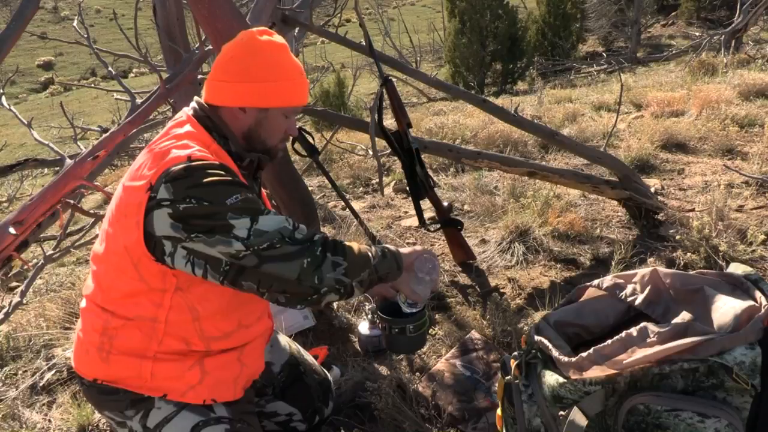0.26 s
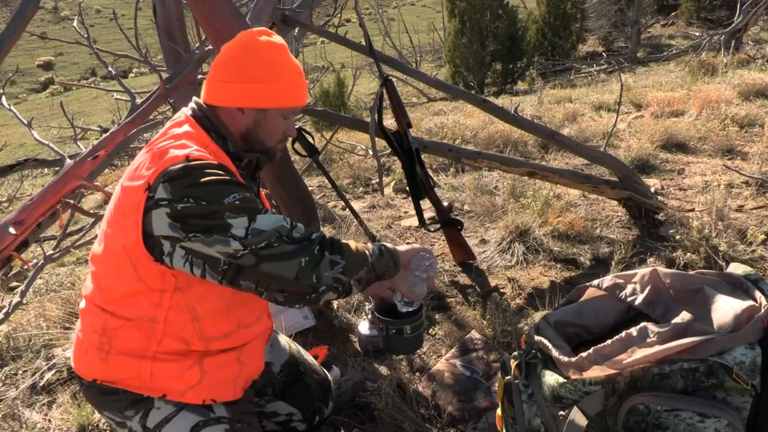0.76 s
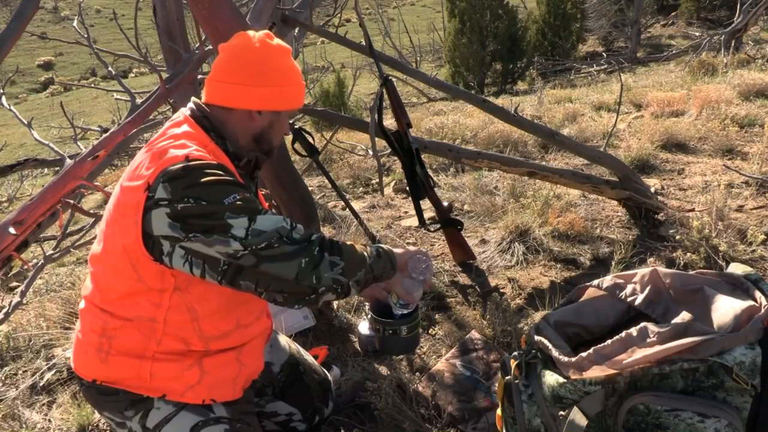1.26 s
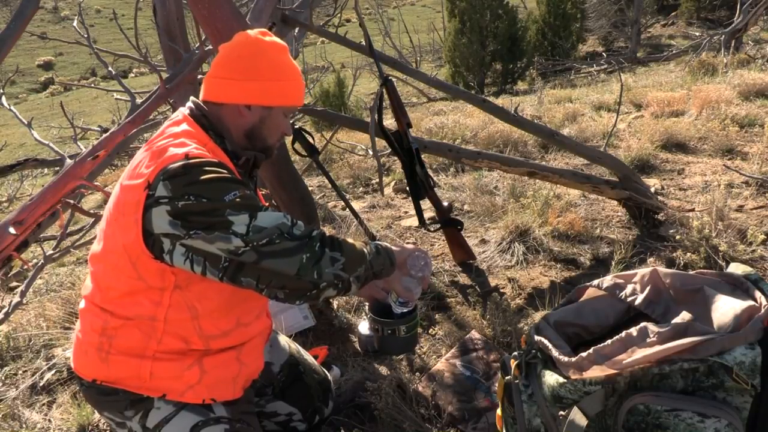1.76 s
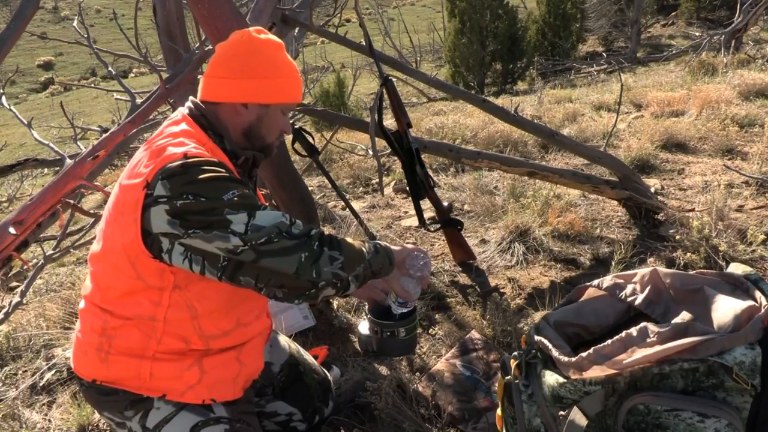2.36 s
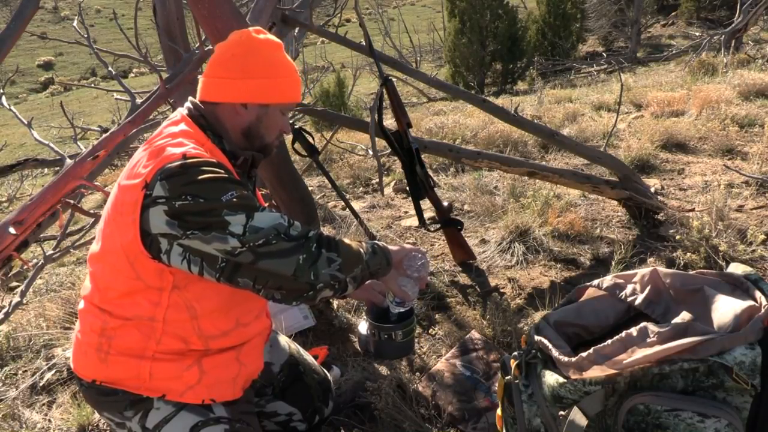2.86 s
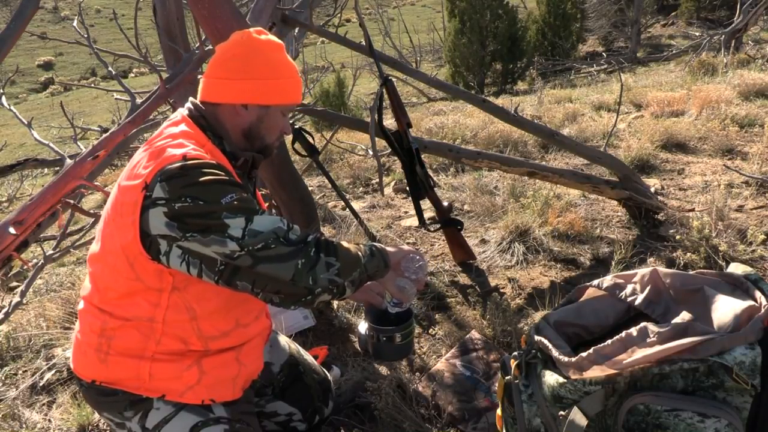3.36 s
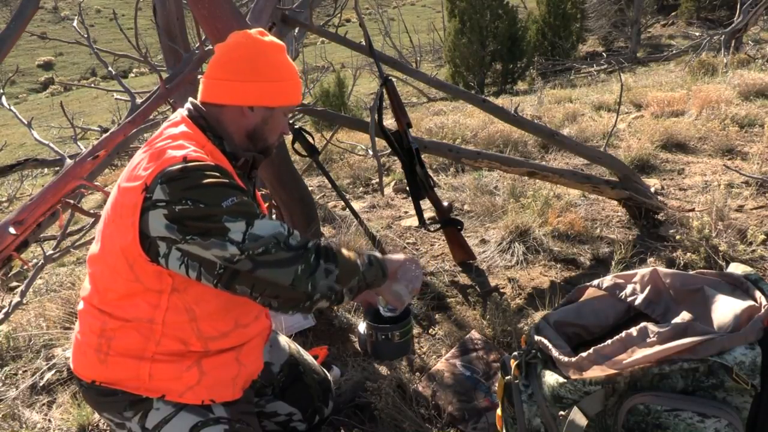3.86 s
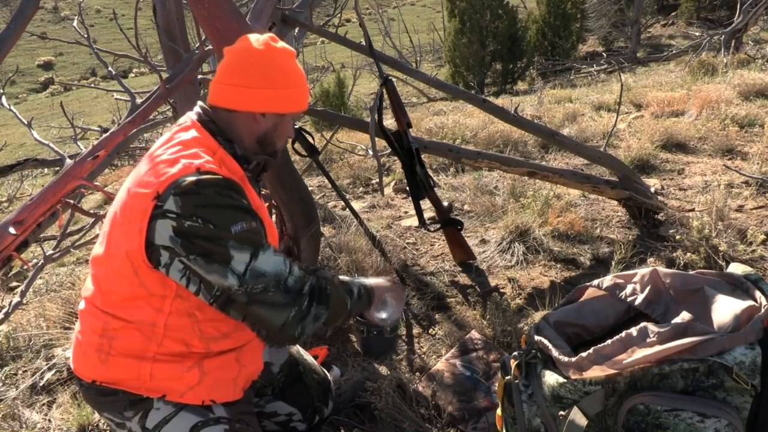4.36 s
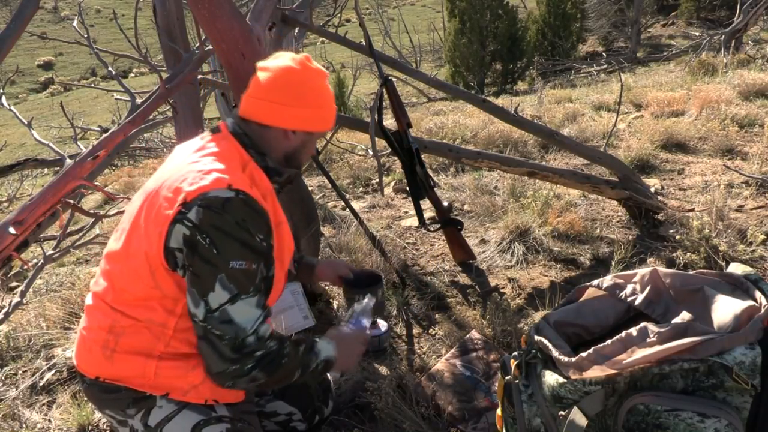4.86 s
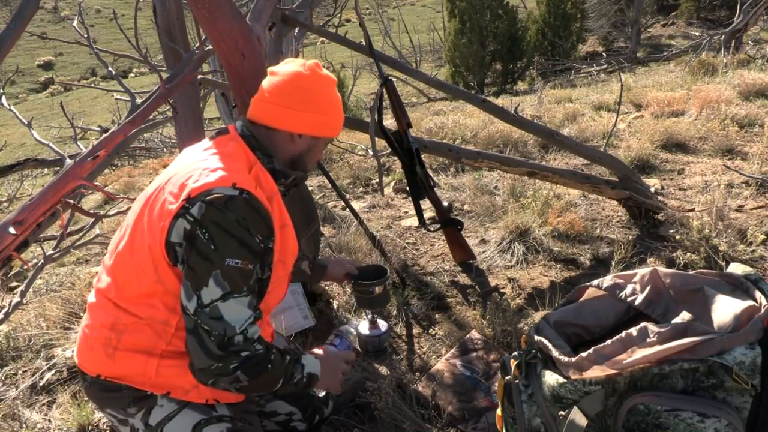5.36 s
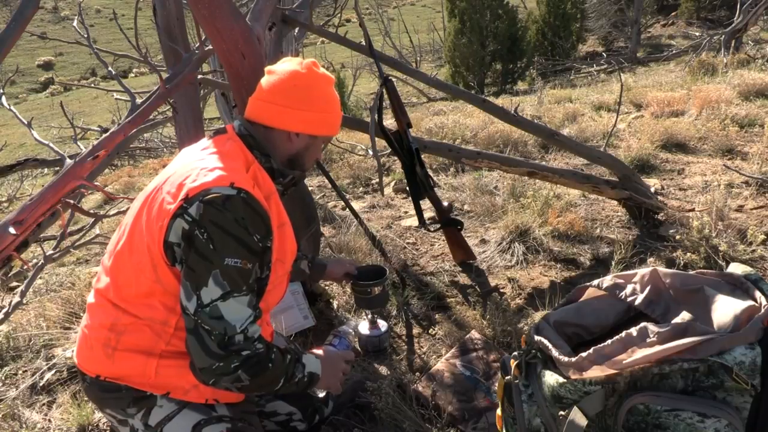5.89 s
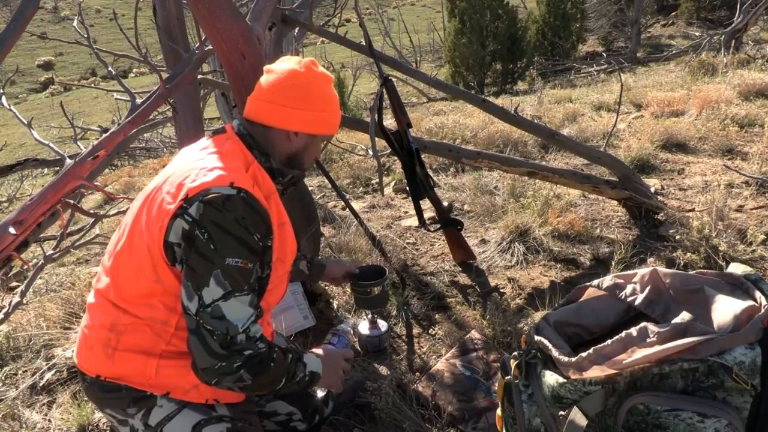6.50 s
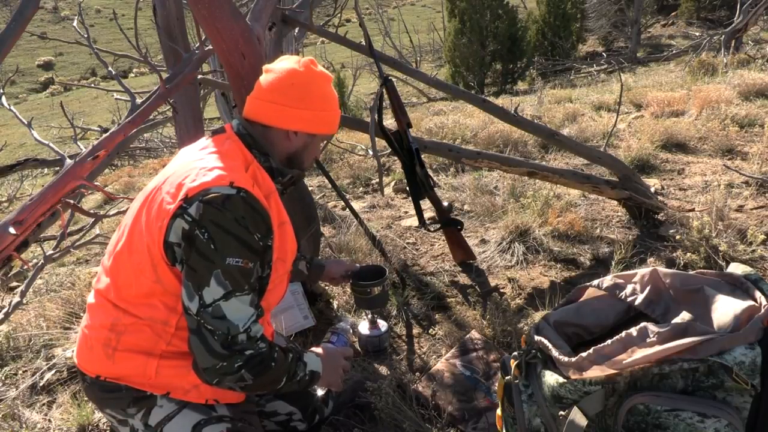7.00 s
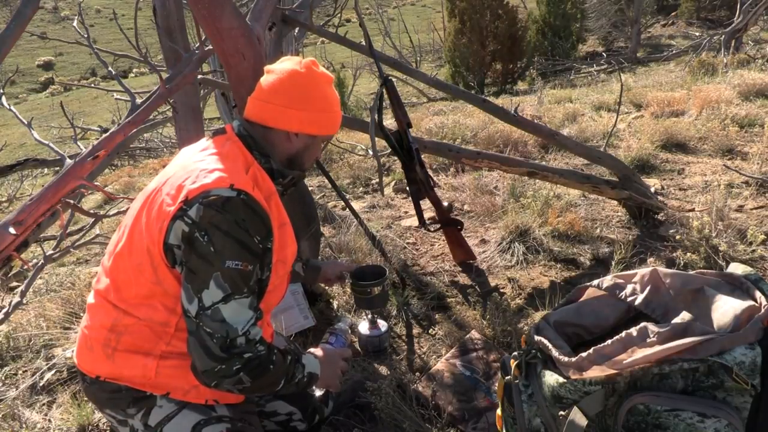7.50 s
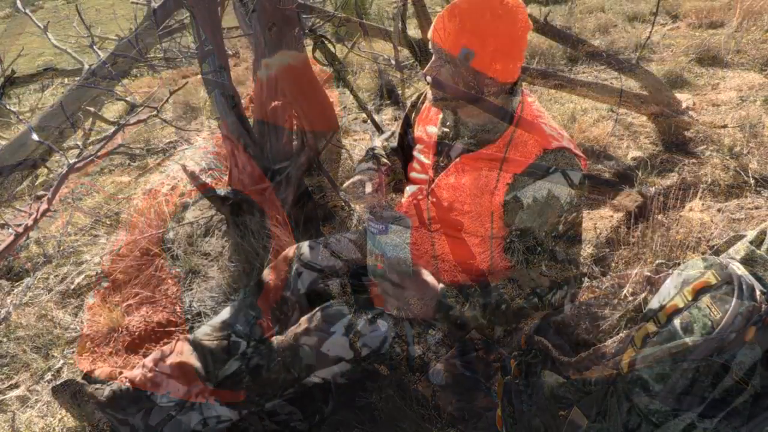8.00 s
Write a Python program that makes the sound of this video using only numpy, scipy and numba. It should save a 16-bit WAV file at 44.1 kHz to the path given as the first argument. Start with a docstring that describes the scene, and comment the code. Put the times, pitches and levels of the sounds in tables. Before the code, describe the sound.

A close outdoor microphone picks up lumpy pouring, chirping bubbles and droplets in a small metal pot, the tone rising slightly as it fills. After the stream ends, faint scuffs lead to one hard plastic snap, a cluster of tiny metallic clinks and light sliding. Wind rumble, slight hiss and a weak distant hum continue until final knocks and rustling.

```python
"""Water poured into a metal pot

Water glugs from a plastic bottle into a thin metal pot: bubbles chirp, drops ring, and the lower pot modes rise
as it fills. Then the bottle snaps back into shape (noise bursts through resonances), small metal parts clink
(noise bursts into modes) and cloth rustles (dense grains).
Outdoors, wind buffets the microphone (shaped noise) and a faint drone of two harmonics hums far away."""
import sys
import numpy as np
from scipy import signal
from scipy.fft import rfft, irfft
from scipy.io import wavfile
from numba import njit

SR = 44100
rng = np.random.default_rng(int(sys.argv[2]) if len(sys.argv) > 2 else 0)


def output_pcm(signal):
    """Save a mono or channel-first signal as 16-bit PCM at the path in sys.argv[1].

    Samples are clipped to [-1, 1] before scaling.
    """
    pcm = np.clip(np.atleast_2d(signal).T, -1, 1) * 32767
    wavfile.write(sys.argv[1], SR, np.round(pcm).astype(np.int16))


N = 363384

# the pouring stream: t/s, gurgle level/dB, spray level/dB
STREAM = [(0.0, -50.5, -61), (0.23, -52.5, -58.5), (0.45, -44, -57), (1.21, -45.5, -54), (1.47, -49, -56.5),
          (1.86, -44, -55.5), (1.99, -48.5, -53.5), (2.23, -49.5, -56.5), (2.66, -47.5, -57),
          (3.18, -39, -49.5), (3.65, -55, -62.5), (3.75, -63, -65)]
# spectral density of the spray: f/Hz, level/dB
SPRAY_SPECTRUM = [(1200, -32), (2000, -12.5), (3200, -4), (5000, 1), (6600, -5.5), (8000, 0), (10300, -10),
                  (13700, -1), (15700, -7), (16400, -40)]
# modes of the wall and the air above the water: f empty/Hz, f full/Hz, level/dB, t60/s
POT_MODES = [(715, 830, -7, 0.11), (1150, 1190, 8, 0.0081), (1864, 1950, -7, 0.07),
             (1983, 2030, -11, 0.035), (2510, 2540, -16, 0.039), (3100, 3060, -16.5, 0.032)]
FULL_AT_S = 3.1
DROP_T60_S = 0.014   # a drop ringing on the water


def amp(db):
    """Logarithmic level: decibels to an amplitude factor."""
    return 10 ** (np.asarray(db) / 20)


def unit(x):
    """Normalisation by signal power: scale to rms 1."""
    return x / np.sqrt(np.mean(x ** 2) + 1e-20)


def in_time(rows, outside_db=None):
    """Linear interpolation: each column of a curve at every sample."""
    s, *columns = np.transpose(rows)
    t = np.arange(N) / SR
    return np.array([np.interp(t, s, column, outside_db, outside_db) for column in columns])


def coloured(x, spectrum):
    """Spectral shaping: weight each frequency by a dB curve over log frequency; rms 1."""
    hz = np.maximum(np.fft.rfftfreq(len(x), 1 / SR), 1)
    f, db = np.transpose(spectrum)
    gain = amp(np.interp(np.log(hz), np.log(f), db))
    return unit(irfft(rfft(x) * gain, len(x)))


def band(x, lo_hz, hi_hz):
    """Causal Butterworth band-pass."""
    edges = [lo_hz, min(hi_hz, .45 * SR)]
    return signal.sosfilt(signal.butter(2, edges, "band", fs=SR, output="sos"), x)


def drift(rate_hz):
    """Low-passed noise: white noise through a double real pole, a slow random sway of rms 1."""
    r = np.exp(-2 * np.pi * rate_hz / SR)
    noise = rng.standard_normal(N + SR)
    return unit(signal.lfilter([1], [1, -2 * r, r * r], noise)[SR:])   # drop the filter's first second


def add(out, s, sound):
    """Superposition: mix a short sound in at a time."""
    i = int(s * SR)
    out[i:i + len(sound)] += sound[:max(N - i, 0)]


def grains(per_s, spread_db):
    """Shot noise: clicks at random times, of uneven size and random sign."""
    sizes = amp(spread_db * np.minimum(rng.exponential(1, N), 5)) * rng.choice([-1, 1], N)
    return sizes * (rng.random(N) < per_s / SR) + 1e-18


def ring(x, hz, t60):
    """Damped oscillator as a two-pole filter; a unit click rings at height about 1."""
    r, w = amp(-60 / (t60 * SR)), 2 * np.pi * hz / SR
    return signal.lfilter([0, np.sin(w)], [1, -2 * r * np.cos(w), r * r], x)


@njit
def glide(x, hz, t60, sr):
    """Damped oscillator of moving frequency; a unit click rings at height about 1."""
    y = np.zeros(len(x))
    r = 10 ** (-3 / (t60 * sr))
    for i in range(2, len(x)):
        w = 2 * np.pi * hz[i] / sr
        y[i] = np.sin(w) * x[i - 1] + 2 * r * np.cos(w) * y[i - 1] - r * r * y[i - 2]
    return y


def bubble(hz, t60, rise, swell_s, scoop=0):
    """Bubble resonance: a sine that swells, dies and by its rise climbs towards the surface; peak 1."""
    scoop_s = 0.0006   # time constant of the climb from below at birth
    t = np.arange(int((t60 + 3 * swell_s) * SR)) / SR
    climb = rise * t * t / t60   # the pitch is up by a share 2 * rise after one t60
    birth = np.clip(scoop, -.5, .6) * scoop_s * np.exp(-t / scoop_s)
    cycles = hz * (t + climb + birth)
    envelope = amp(-60 * t / t60) * (1 - np.exp(-t / swell_s)) ** 2
    tone = np.sin(2 * np.pi * (cycles - cycles[0])) * envelope
    return tone / np.abs(tone).max()


def pot(blows):
    """Modal resonance: modes shift as the level climbs, the lower ones upward, and waver as it sloshes."""
    fill = np.clip(np.arange(N) / SR / FULL_AT_S, 0, 1)
    modes = []
    for empty_hz, full_hz, db, t60 in POT_MODES:
        hz = (empty_hz + (full_hz - empty_hz) * fill) * (1 + 0.025 * drift(10.4))
        modes.append(amp(db) * glide(blows, hz, t60, SR))
    return modes


def droplets(per_s, cycles):
    """Independent resonators: tiny drops ring at one of 36 pitches with equal t60 in cycles; rms 1."""
    hits, dealt = grains(per_s, 4.3), rng.integers(0, 36, N)
    total = np.zeros(N)
    for k, hz in enumerate(np.geomspace(2200, 15000, 36)):
        total += ring(hits * (dealt == k) + 1e-18, hz, cycles / hz) * np.sqrt(hz)
    return coloured(total, SPRAY_SPECTRUM)


def breaks_db():
    """Interrupted flow: level dips where the stream breaks off while air enters the bottle."""
    # breaks in the flow: middle t/s, length/s
    breaks = [(0.383, 0.074), (0.814, 0.051), (1.01, 0.012), (1.244, 0.031), (1.408, 0.056), (1.542, 0.027),
              (1.625, 0.048), (1.876, 0.06), (2.096, 0.056), (2.407, 0.046), (2.56, 0.062), (2.868, 0.078),
              (3.054, 0.11), (3.192, 0.068), (3.417, 0.036)]
    out = np.zeros(N)
    for s, length in breaks:
        add(out, s - length / 2, -9.5 * np.hanning(int(length * SR)) ** .5)   # dB
    return out


def lesser(count):
    """Random events: rows (s, dB about a median less any dip, three chances 0-1) as the stream runs."""
    when, size, *chances = rng.random((count, 5)).T
    s = when * STREAM[-2][0]
    db = 14 * (size - .5) + 2 * breaks_db()[(s * SR).astype(int)]
    return np.transpose([s, db, *chances])


def stream():
    """Random excitation of resonators: small bubbles and spray, lumpy as the flow breaks up."""
    gurgle_db, spray_db = in_time(STREAM, outside_db=-120) + breaks_db()
    lumps = amp(5.8 * np.minimum(drift(21.8), 1.8))
    small_bubbles = np.zeros(N)
    for s, pitch, size, rise in rng.random((1000, 4)):
        hz = 560 * 2.5 ** pitch
        chirp = bubble(hz, 25 / hz, 0.34 * rise - .05, 0.0021)
        add(small_bubbles, s * 3.75, amp(20 * size) * chirp)
    pot_ring = unit(sum(pot(grains(790, 3.6) * lumps)))
    churn = unit(band(grains(3000, 3.0), 550, 1750)) * lumps ** 0.4   # churning froth
    gurgle = pot_ring + amp(-7.0) * unit(small_bubbles) + amp(-9.5) * churn
    drops = droplets(3000, cycles=56.0) * lumps ** 0.6
    froth = unit(band(grains(6000, 3.7), 1200, 4600)) * lumps ** 0.52
    spray = drops + amp(-10.5) * froth
    return amp(gurgle_db - 6.0) * gurgle + amp(spray_db - 3.0) * spray


def plops():
    """Bubble resonance: each large bubble chirps, born in a short dull slap; lesser ones come at random."""
    # large bubbles: t/s, level/dB, f/Hz, t60/s, relative slap level/dB, swell/ms
    large = [(.064,-33.5,680,0.031,-39.5,.4), (.113,-41,700,0.049,-48,2), (.156,-37.5,1150,0.057,-48,.5),
             (.157,-43,700,.04,-58,1), (.175,-43,690,0.12,-44,0.88), (.234,-35.5,733,0.049,-47,1.5),
             (.261,-22.5,707,0.035,-33.5,0.46), (.275,-34.5,760,0.096,-34.5,5.1),
             (.305,-42,730,0.059,-52,3.6), (.397,-35,720,0.045,-38,2.2), (.407,-21,754,0.05,-27.5,1.7),
             (.455,-35,686,0.032,-40,0.89), (.479,-27,684,0.03,-42,0.54), (.508,-32.5,784,0.043,-34.5,0.88),
             (.539,-37,760,0.046,-36,.6), (.551,-35,690,0.077,-52,4), (.589,-36,720,0.037,-42,0.68),
             (.607,-47,1200,.03,-44,1), (.62,-42,1240,.03,-55,1), (.65,-39,1250,.035,-51,1),
             (.676,-38,780,.035,-52,1.3), (.708,-38,720,0.022,-42,.8), (.735,-32.5,680,0.024,-55,.7),
             (.776,-48,730,0.037,-59,1), (.793,-40,725,0.044,-56,1), (.833,-42.5,1340,0.042,-60,1.1),
             (.852,-56,700,.04,-62,1), (.871,-48,750,.05,-38,.7), (.901,-38,740,0.069,-52,3.8),
             (.936,-37.5,740,0.074,-31.5,.7), (1.03,-44,710,0.067,-53,2), (1.059,-37,748,0.1,-57,2.3),
             (1.084,-41,1060,.035,-54,1), (1.112,-42.5,786,0.056,-53,2), (1.156,-35,754,0.038,-49,.7),
             (1.191,-37,1290,0.054,-50,.6), (1.2,-37,752,0.096,-58,3.3), (1.275,-38,778,0.16,-37.5,.7),
             (1.317,-25.5,770,0.047,-41,0.59), (1.347,-39.5,767,0.09,-43,2.2), (1.266,-47,735,.04,-42,1.5),
             (1.44,-35.5,1130,0.052,-42,.7), (1.492,-38,720,.03,-53,1), (1.549,-37,730,0.044,-36,.5),
             (1.617,-41,1270,.03,-51,.8), (1.654,-28.5,770,0.029,-38,0.38), (1.703,-33,757,0.066,-50,2),
             (1.723,-21.5,750,0.025,-43,1), (1.736,-22,780,0.027,-52,1), (1.772,-33,774,0.028,-50,1),
             (1.785,-31,747,0.085,-41,0.9), (1.937,-35,1065,.025,-46,0.36), (1.954,-36,790,0.054,-54,3),
             (2.014,-18.5,678,0.026,-47,1.8), (2.033,-35.5,768,0.066,-50,1.5), (2.034,-36,1350,0.037,-55,1),
             (2.064,-40.5,742,.09,-56,1.5), (2.151,-32.5,790,.065,-38.5,0.76), (2.178,-36,750,.03,-44,.7),
             (2.203,-44,1260,0.033,-57,1.5), (2.216,-51,810,.04,-50,2), (2.281,-41,805,0.046,-39,.7),
             (2.302,-40,774,0.047,-52,1.5), (2.328,-31.5,1270,0.022,-42,0.55), (2.391,-40,770,.04,-52,1.8),
             (2.427,-42,764,.045,-48,1.1), (2.455,-35.5,860,0.037,-46,.8), (2.5,-35,724,0.026,-55,0.63),
             (2.527,-34.5,825,0.04,-52,0.89), (2.605,-21.5,802,0.028,-34.5,1), (2.636,-40,1080,.04,-46,1),
             (2.67,-41,700,.05,-49,2), (2.738,-34.5,724,0.029,-54,1), (2.758,-32.5,1260,0.037,-41,.6),
             (2.772,-26.5,775,0.024,-44,0.77), (2.914,-19,789,0.037,-28.5,0.63),
             (2.947,-34,712,.06,-41,1.5), (2.96,-26,655,0.063,-39,1.7), (2.985,-39,790,0.056,-38,1),
             (3.082,-26,779,0.089,-29.5,0.81), (3.125,-24,1400,0.027,-38,0.45), (3.169,-39,856,0.07,-54,1),
             (3.222,-42,796,.03,-51,1.5), (3.223,-41,1300,.04,-55,1.5), (3.237,-25,770,0.022,-32,0.38),
             (3.249,-38,787,0.12,-54,1.8), (3.289,-39.5,704,0.053,-50,1.5), (3.324,-39,766,0.064,-53,1),
             (3.348,-36,890,0.034,-44,0.71), (3.408,-51,1440,0.044,-53,2), (3.457,-35,1090,0.057,-44,.6),
             (3.482,-44,1050,0.039,-53,.6), (3.551,-35,1230,.04,-52,0.66), (3.59,-40,1400,.03,-50,1)]
    median_db = -56   # of the lesser bubbles
    out, t = np.zeros(N), np.arange(SR // 20) / SR
    small = []
    for s, db, a, b, c in lesser(count=16):
        mode_hz = np.interp(s, [0, FULL_AT_S], POT_MODES[int(a > .8)][:2])   # pitched near a pot mode
        level_db = median_db + db
        small.append((s, level_db, mode_hz * (1.0 + 0.066 * b), .05, level_db - 12 * c, 1 + 2 * b))
    rows = list(large) + small
    for (s, db, hz, t60, slap_db, swell_ms), noise in zip(rows, rng.standard_normal((len(rows), len(t)))):
        chirp = bubble(hz, max(t60, .01), 0.033, max(swell_ms, .1) / 1000, scoop=0.2)   # starts 20 % low
        add(out, s, amp(db) * chirp)
        add(out, s, amp(slap_db + 14.5) * band(noise * amp(-60 * t / 0.054), 286, 1230))
    return out


def glugs():
    """Cavity resonance: the pitch glides, mostly up, ever faster as the pocket shrinks until it bursts."""
    # air pockets: start t/s, length/s, first f/Hz, last f/Hz, level/dB before the wobble
    pockets = [(0.64, 0.037, 634, 810, -40), (0.979, 0.023, 590, 810, -43), (1.438, 0.035, 634, 856, -39.5),
               (1.547, 0.015, 1105, 845, -28), (1.553, 0.041, 518, 920, -26),
               (1.729, 0.016, 1220, 1255, -27.5), (1.819, .022, 607, 870, -38),
               (2.06, 0.012, 1280, 1530, -34), (2.33, 0.049, 488, 900, -39.5),
               (2.37, 0.017, 1040, 1610, -31.5), (2.665, 0.017, 967, 1350, -38),
               (2.685, 0.022, 1060, 1420, -39), (2.778, 0.038, 593, 877, -38),
               (2.806, 0.022, 843, 1356, -43), (2.935, 0.022, 1330, 1540, -39),
               (3.005, 0.025, 1350, 1200, -39.5), (3.118, 0.033, 598, 880, -36),
               (3.233, 0.026, 383, 500, -32.5), (3.337, 0.036, 813, 1300, -43),
               (3.424, 0.025, 1150, 1500, -50), (3.463, 0.013, 1020, 1440, -38.5),
               (3.598, 0.018, 700, 1370, -34.5)]
    out = np.zeros(N)
    for s, length, first_hz, last_hz, db in pockets:
        u = np.linspace(0, 1, int(length * SR))
        hz = first_hz * (last_hz / first_hz) ** (u ** 1.46)
        phase = 2 * np.pi * np.cumsum(hz) / SR
        add(out, s, amp(db) * np.sin(np.pi * u ** 2.1) * np.sin(phase))   # late swell, quick stop
    return out * amp(2.5 * drift(77.0))   # a pocket wobbles as it shrinks


def splashes():
    """Impact spatter: each slug throws dying drops, with one distinct plink; lesser slugs come at random."""
    # slugs of water: t/s, relative level/dB, t60/s, relative brightness/dB, plink f/Hz
    slugs = [(0.071, -36, 0.03, -14, 3000), (0.1017, -39, 0.037, -12, 3700),
             (0.154, -34.5, 0.023, -7, 8300), (0.2438, -33.5, 0.068, -21, 4940),
             (0.2593, -34.5, 0.23, -14.5, 3070), (0.397, -32, .06, -10, 2400),
             (0.407, -17, 0.037, -22, 2510), (0.416, -16, 0.041, -11, 7260),
             (0.4823, -36, 0.052, -14, 2570), (0.5092, -34, 0.095, -15, 2600),
             (0.5404, -30, 0.086, -13, 2510), (0.5906, -40, 0.04, -9, 4730), (0.634, -41, 0.04, -7, 2450),
             (0.651, -45, 0.045, -8, 2510), (0.6784, -46, 0.05, -4.5, 2400), (0.7364, -35, 0.11, -19, 2850),
             (0.8682, -25, 0.034, -11.5, 4800), (0.9378, -44, 0.065, -4.5, 2270),
             (1.0287, -35, 0.033, -10, 4330), (1.038, -33, 0.05, -17, 7200), (1.058, -33, 0.017, -17, 2350),
             (1.0979, -34, 0.056, -13, 4430), (1.1373, -32.5, 0.031, -3.5, 3760),
             (1.1564, -23, 0.013, -6, 7570), (1.1897, -38, 0.031, -9, 4200),
             (1.2727, -26.5, 0.056, -12.5, 7700), (1.3146, -26, 0.032, -14, 2510),
             (1.3425, -34.5, 0.08, -13, 3190), (1.4396, -33.5, 0.065, -10, 4960),
             (1.481, -44, 0.028, -13, 4930), (1.4945, -33.5, 0.042, -9.5, 5130),
             (1.5504, -44, 0.04, -9, 2700), (1.578, -37, 0.044, -12, 4330), (1.5898, -45, 0.032, 6, 2700),
             (1.6545, -26, 0.063, -15.5, 4920), (1.723, -40, 0.048, -6, 5260),
             (1.7434, -38.5, 0.045, -13, 4500), (1.7794, -33, 0.045, -24, 3500),
             (1.8352, -31, 0.021, -28, 2900), (1.9155, -39, 0.064, -7, 3000),
             (1.95, -28.5, 0.017, -18, 2320), (1.9766, -40, 0.035, -14, 2370),
             (2.0136, -21, 0.027, -31, 4880), (2.0662, -20, 0.033, -23, 8070),
             (2.1512, -23.5, 0.052, -15, 4940), (2.1724, -38, 0.064, 1.5, 2400),
             (2.2811, -17, 0.03, -16.5, 4550), (2.3264, -35, 0.04, -24, 2580),
             (2.352, -25.5, 0.029, -24, 4800), (2.3762, -24.5, 0.011, -28, 3940),
             (2.4334, -34.5, 0.13, -10, 4690), (2.502, -37, 0.032, -3.5, 4170),
             (2.5298, -28, 0.06, -24, 2720), (2.6065, -22.5, 0.092, -15, 8000),
             (2.6823, -33, 0.058, -12, 7200), (2.7024, -21.5, 0.019, -34, 4350),
             (2.7572, -29, 0.051, -14, 4700), (2.805, -36.5, 0.054, -10.5, 5100),
             (2.8619, -29, 0.019, -28, 2570), (2.9048, -35, 0.02, -4, 4640),
             (2.9135, -23, 0.041, -13.5, 7860), (2.9365, -37, 0.041, -7, 2400),
             (2.9562, -33, 0.032, -23, 3280), (2.9747, -29, 0.036, -20, 3630),
             (2.9931, -36.5, 0.024, -1, 2520), (3.0656, -29, 0.043, -20, 4200),
             (3.0827, -20.5, 0.05, -19, 3310), (3.125, -16.5, 0.021, -12.5, 5200),
             (3.1637, -26.5, 0.023, -21, 3260), (3.1872, -32, 0.021, -14, 7460),
             (3.237, -25.5, 0.012, -8, 5300), (3.2585, -37, 0.067, -9, 5060), (3.29, -32, 0.032, -2, 4850),
             (3.3194, -36, 0.04, -23, 4060), (3.459, -29.5, 0.014, -24, 3160),
             (3.4815, -41.5, 0.026, -5, 7430), (3.5015, -38, 0.039, -10, 8130),
             (3.55, -37, 0.024, -7, 7900), (3.5713, -37, 0.031, -11, 7630), (3.812, -44, 0.01, -8, 8500)]
    median_db = -42   # relative level of the lesser slugs
    low, high, plinks = np.zeros((3, N))
    t = np.arange(SR // 8) / SR
    small = [(s, median_db + db, 0.02 + 0.042 * a, -16 * b, 2300 * 3 ** c)
             for s, db, a, b, c in lesser(count=14)]
    for s, db, t60, bright_db, hz in list(slugs) + small:
        fall = amp(-60 * t / max(t60, .005)) * (1 - np.exp(-t / 0.0015))
        add(low, s, amp(db - 9.0) * fall)
        add(high, s, amp(db + bright_db + 3.5) * fall)
        add(plinks, s, amp(db - 8.5) * bubble(hz, DROP_T60_S, 0.0096, 0.00024))
    wash = coloured(rng.standard_normal(N), SPRAY_SPECTRUM)   # smooth wet hiss among the drops
    drops = droplets(4500, cycles=33.0) + amp(-9) * wash
    return low * unit(band(drops, 1160, 7600)) + high * unit(band(drops, 5480, 13100)) + plinks


def drips():
    """Free decay: drops ring briefly, longer at the pitch of the wall; small bubbles chirp upward."""
    # single drops: t/s, level/dB, f/Hz
    drops = [(0.007, -44, 4090), (0.154, -42, 8130), (0.179, -47, 4260), (0.265, -49, 8700),
             (0.266, -45, 2560), (0.266, -45, 5730), (0.283, -46, 3830), (0.317, -44, 3120),
             (0.399, -40, 7490), (0.401, -46, 6160), (0.402, -42, 4950), (0.409, -25, 1904),
             (0.414, -25.5, 3030), (0.421, -33, 1920), (0.454, -44, 1870), (0.533, -43, 1890),
             (0.541, -39, 3800), (0.547, -42, 4650), (0.548, -37, 2480), (0.606, -48, 4780),
             (0.619, -46, 2030), (0.631, -48, 1940), (0.641, -48, 1930), (0.652, -43, 8400),
             (0.726, -40, 2500), (0.735, -44, 4090), (0.743, -45, 4610), (0.746, -45, 1890),
             (0.747, -39, 2900), (0.775, -47, 2500), (0.957, -43, 2000), (1.032, -45.5, 3730),
             (1.032, -45, 5030), (1.039, -45, 4350), (1.06, -47, 4650), (1.062, -32, 1900),
             (1.144, -48, 1950), (1.158, -43, 2580), (1.191, -40, 1910), (1.23, -46, 3660),
             (1.273, -41, 4900), (1.273, -41, 8700), (1.275, -41, 1950), (1.29, -43, 5000),
             (1.301, -45, 3280), (1.304, -45, 2630), (1.316, -43, 7920), (1.316, -37, 4910),
             (1.342, -47, 4780), (1.343, -45, 6240), (1.355, -38, 1934), (1.381, -47, 1940),
             (1.457, -47, 5210), (1.481, -44, 4950), (1.589, -50, 8140), (1.593, -32, 1880),
             (1.653, -46, 6890), (1.654, -41, 8610), (1.654, -44, 7710), (1.7, -45, 1940),
             (1.714, -44, 1810), (1.784, -31.5, 1930), (1.836, -39, 3750), (1.936, -40, 2940),
             (1.978, -45, 8270), (2.031, -41, 1966), (2.046, -45, 1980), (2.152, -45, 7320),
             (2.153, -53, 3100), (2.153, -39, 6170), (2.164, -37, 4870), (2.166, -43, 2200),
             (2.172, -38, 9470), (2.172, -46, 7840), (2.272, -37, 3830), (2.281, -45, 8740),
             (2.281, -38, 7280), (2.329, -36, 1980), (2.367, -40, 3770), (2.44, -46, 2120),
             (2.445, -43, 4650), (2.449, -38, 2630), (2.451, -40, 7940), (2.452, -43, 2000),
             (2.529, -45, 7750), (2.531, -41, 4860), (2.532, -44, 1980), (2.608, -33, 3720),
             (2.615, -40, 1940), (2.62, -47, 6120), (2.694, -38, 4910), (2.697, -35, 1980),
             (2.712, -34.5, 4100), (2.714, -47, 1950), (2.738, -44, 2600), (2.755, -43, 6800),
             (2.756, -44, 8530), (2.758, -39.5, 3340), (2.806, -45, 3830), (2.806, -44, 1980),
             (2.821, -43, 1940), (2.876, -39.5, 2520), (2.914, -33, 5000), (2.936, -46, 7900),
             (2.936, -37, 4740), (2.938, -40, 5400), (2.975, -47, 6200), (2.982, -45, 7800),
             (2.992, -42, 7320), (2.994, -34.5, 2030), (2.997, -49, 4740), (3.015, -44, 1990),
             (3.086, -34.5, 7750), (3.093, -45, 4820), (3.125, -35, 3960), (3.128, -49, 7900),
             (3.237, -47, 3660), (3.237, -40, 7500), (3.237, -36, 6160), (3.259, -48, 3660),
             (3.265, -39, 5120), (3.291, -46, 4010), (3.328, -44, 2010), (3.331, -47, 3830),
             (3.349, -51, 1980)]
    # small bubbles: t/s, level/dB, f/Hz
    blips = [(0.133, -49, 600), (0.425, -31, 1240), (0.433, -33, 690), (0.495, -46, 730),
             (0.629, -48, 1720), (0.658, -35, 680), (0.878, -48, 870), (0.889, -42, 1730),
             (0.965, -50, 1720), (1.125, -52, 1730), (1.147, -41, 1340), (1.275, -35, 1164),
             (1.29, -37, 835), (1.432, -42, 730), (1.505, -47, 1030), (1.514, -45, 1030),
             (1.591, -43, 1660), (1.713, -45, 1700), (1.84, -40, 1490), (2.127, -50, 606), (2.14, -49, 600),
             (2.223, -49, 1590), (2.241, -48, 1300), (2.291, -37, 1110), (2.435, -39, 1080),
             (2.562, -54, 1160), (2.571, -45, 865), (2.596, -41, 1370), (2.821, -37, 1030),
             (2.984, -31, 685), (3.0, -34, 864), (3.065, -54, 1590), (3.156, -42, 990), (3.292, -43, 1260),
             (3.314, -41, 945), (3.378, -46, 900), (3.383, -47, 1290), (3.413, -55, 860), (3.507, -49, 685),
             (3.562, -43, 1160)]
    # pitch range of drops that set the wall ringing: lowest f/Hz, highest f/Hz
    wall_hz = (1780, 2120)
    wall_t60_s = 0.031
    out = np.zeros(N)
    for s, db, hz in drops:
        on_wall = wall_hz[0] < hz < wall_hz[1]
        t60, swell_s = (wall_t60_s, 0.0012) if on_wall else (DROP_T60_S, 0.0006)
        add(out, s, amp(db) * bubble(hz, t60, 0.0074, swell_s))
    for s, db, hz in blips:
        add(out, s, amp(db) * bubble(hz, 23 / hz, 0.1, 0.001))   # falls 60 dB in 23 nominal cycles
    return out


def wall():
    """Forced vibration: each surge strikes the upper pot modes and pushes them with brief turbulence."""
    # surges: t/s, relative level/dB
    jolts = [(0.0697, -57), (0.1759, -32), (0.236, -31.5), (0.279, -28.5), (0.316, -38), (0.41, -20.5),
             (0.421, -39), (0.453, -42), (0.5095, -26), (0.5422, -30), (0.736, -40), (0.8769, -50),
             (0.941, -35), (1.037, -42), (1.061, -32.5), (1.1189, -38), (1.16, -37), (1.1735, -30),
             (1.274, -42), (1.293, -35), (1.3203, -28), (1.353, -33), (1.4486, -45), (1.552, -34),
             (1.592, -36), (1.6552, -40), (1.7365, -30), (1.7797, -39), (1.809, -33), (1.832, -26),
             (1.9128, -36), (1.935, -32.5), (2.0133, -36), (2.032, -35), (2.0728, -27), (2.175, -37),
             (2.1905, -32.5), (2.219, -40), (2.263, -32), (2.2825, -31), (2.3263, -32), (2.4293, -39),
             (2.452, -28.5), (2.53, -36), (2.6, -38), (2.6665, -31), (2.69, -30), (2.7245, -27.5),
             (2.7616, -37), (2.8335, -37), (2.9045, -45), (2.9442, -19), (2.9943, -31), (3.0864, -39),
             (3.126, -24), (3.1617, -40), (3.3187, -32), (3.3872, -42), (3.594, -35.5), (3.6847, -40)]
    push, strikes, t = np.zeros(N), np.zeros(N), np.arange(SR // 10) / SR
    for s, db in jolts:
        add(push, s, amp(db - 27.0 - 60 * t / 0.061))
        add(strikes, s, amp(db - 17.0) * np.hanning(7))
    return sum(pot(push * rng.standard_normal(N) + strikes + 1e-18)[2:])


def snaps():
    """Buckling: a wall that snaps sends a sharp crack of noise through three resonances, with treble."""
    # plastic snaps and knocks: t/s, relative level/dB, t60/s, body f/Hz, body width as a ratio,
    # edge f/Hz, edge, treble relative level/dB, bass f/Hz, bass relative level/dB
    buckles = [(4.154, -33.5, 0.089, 1400, 1.28, 3600, -10, -10, 500, -6),
               (4.6069, -6.5, 0.02, 1380, 1.266, 2130, 6, -6, 560, -9),
               (4.6083, -9.5, 0.03, 1370, 1.25, 3130, 2.5, 0.5, 560, -6),
               (4.71, -48, 0.01, 2600, 1.2, 7900, 4, -10, 500, -20),
               (4.225, -46, 0.03, 2000, 1.1, 2600, 0, -14, 500, -20),
               (4.405, -50, 0.03, 1800, 1.2, 2500, -2, -14, 500, -20),
               (7.284, -31, 0.018, 1420, 1.5, 3030, -7, -12, 484, -2.5),
               (7.831, -24.5, 0.02, 1070, 1.3, 2900, -5, -3, 384, 4),
               (7.8331, -17.5, 0.026, 940, 1.3, 3020, -10, -10.5, 340, 0),
               (7.841, -36, 0.022, 900, 1.3, 2950, -8, -10, 480, 12.5),
               (8.1583, -13, 0.012, 1550, 1.08, 4140, -3.5, -24, 500, -29),
               (8.1618, -30, 0.013, 1510, 1.07, 4250, 6, -22, 500, -32),
               (8.197, -32, 0.024, 1410, 1.2, 3100, 0, -11, 500, -18),
               (8.224, -35.5, 0.04, 990, 1.1, 3000, 3, -10, 480, 1)]
    out, t = np.zeros(N), np.arange(SR // 10) / SR
    for row, noise in zip(buckles, rng.standard_normal((len(buckles), 4, len(t)))):
        s, db, t60, hz, ratio, edge_hz, edge_db, treble_db, bass_hz, bass_db = row
        noise[:, 0] += 18.0   # the sudden buckle leads
        crack = noise * (amp(-60 * t / t60) + amp(-30.0 - 60 * t / 0.16))   # with a weak longer tail
        body = amp(7.5) * band(crack[0], hz / ratio, hz * ratio)
        edge = amp(edge_db + 5.5) * band(crack[1], edge_hz * 0.91, edge_hz * 1.1)
        treble = amp(treble_db) * band(crack[2], 2400, 6900)
        bass = amp(bass_db + 13.5) * band(crack[3], bass_hz * 0.71, bass_hz * 1.55)
        add(out, s, amp(db - 12.0) * (body + edge + treble + bass))
    return out


def clinks():
    """Modal excitation: each touch chatters into all modes, plus a dull thud; sliding feeds them too."""
    # metal parts touching: t/s, relative level/dB, five zone levels/dB, chatter t60/s, relative thud level/dB
    touches = [(5.358, -17.5, -12, -15, -17, -7, -14, 0.014, -53),
               (5.37, -19, -16, -16, -22, -21, -14, 0.042, -49.5),
               (5.395, -36, -21, -21, -23, -23, -9, 0.02, -62),
               (5.477, -17.5, -10.5, -17, -17, -21, -10, 0.021, -44.5),
               (5.5064, -41, -13, -20, -7, -20, -22, 0.02, -55),
               (5.6454, -30, -9, -24, -13, -11, -30, 0.013, -67),
               (5.7713, -26, -15, -25, -13.5, -13, -16, 0.015, -49),
               (5.8174, -45, -20, -22, -6, -13, -18, 0.03, -50),
               (5.9165, -42.5, -16, -26, 1.5, -19, -24, 0.015, -51.5),
               (6.2805, -46.5, 2, -16, -14, -23, -20, 0.02, -59),
               (6.405, -50, -2, -20, -22, -25, -25, 0.02, -69)]
    # centres of those five zones: f/Hz
    zones_hz = [3000, 4000, 5400, 8500, 13000]
    # centres of clusters of metal modes: f/Hz, relative level/dB, t60/s before each member's damping
    modes = [(2740, -20.5, 0.073), (3070, -11, 0.053), (3970, -14.5, 0.06), (4120, -16, 0.056),
             (5180, -3.5, 0.045), (5660, -12.5, 0.065), (7060, -9, 0.041), (7700, -3.5, 0.048),
             (8300, -8, 0.035), (8500, -12, .06), (9230, -4.5, 0.035), (9100, -19, 0.019),
             (9840, -19, 0.021), (11150, -1, 0.019), (12000, -12, 0.05), (13100, -10, 0.025),
             (13800, -11, .03), (14800, -14, .02)]
    # metal sliding on metal: t/s, relative level/dB, brightness/(dB per octave)
    slide = [(5.375, -63, 2), (5.40, -53, 3), (5.412, -57, 0), (5.425, -66, 2), (5.435, -55, -2),
             (5.465, -60, 4), (5.475, -71, 2), (5.5, -75, -4), (5.74, -75, -14), (5.77, -80, -25),
             (5.9, -88, -25.5), (6.05, -92, -24), (6.2, -90, -16), (6.29, -84, -14), (6.4, -86, -16),
             (6.5, -115, -30), (7.45, -115, -26), (7.56, -90, -26), (7.7, -97, -26), (7.8, -115, -26)]
    out, metal, t = np.zeros(N), np.zeros(N), np.arange(SR // 30) / SR
    hz, mode_db, t60 = np.transpose(modes)
    slide_db, tilt_db = in_time(slide, outside_db=-150)
    octaves = np.log2(hz[:, None] / 7000)
    catch_db = 2.0 * np.array([drift(25.0) for _ in hz])   # each mode catches and lets go
    feed_db = slide_db - 19.5 + mode_db[:, None] + np.maximum(tilt_db, -30) * octaves + catch_db
    blows = amp(feed_db) * unit(grains(9000, 2.2))
    lucks = rng.standard_normal((len(touches), len(modes)))
    for (s, db, *zones_db, chatter_s, thud_db), luck in zip(touches, lucks):
        chatter = rng.standard_normal(len(t)) * amp(-60 * t / chatter_s)
        chatter[0] += 4.0   # first contact
        zone_db = np.interp(np.log(hz), np.log(zones_hz), zones_db)
        strengths = amp(db - 16.0 + mode_db + zone_db + 2.3 * luck)
        for row, strength in zip(blows, strengths):
            add(row, s, strength * chatter)
        add(metal, s, amp(db - 12.0) * chatter)
        add(out, s + 0.00247, amp(thud_db + 10.0) * bubble(606, 0.016, 0, 0.0013))
    metal += amp(slide_db + 1.0 + np.clip(tilt_db, -20, 0)) * rng.standard_normal(N)   # the grit itself
    first, last = int(5.3 * SR), int(7.9 * SR)   # the modes ring only in this span
    # thin bent parts ring in close clusters: (pitch ratio, t60 ratio, signed gain)
    cluster = ((1, 1.0, 1.0), (.965, 0.31, -1.4), (1.03, 0.49, -1.2), (0.97, 0.21, 0.89))
    for row, f, decay in zip(blows[:, first:last], hz, t60):
        for detune, damping, gain in cluster:
            metal[first:last] += gain * ring(row, f * detune, decay * damping)
    return out + band(band(metal, 1500, 16000), 1600, 17000)   # small parts radiate no bass


def rustle():
    """Friction noise: dense scratchy grains that swell and fade with each movement."""
    # cloth and grass scuffs: start t/s, length/s, low, mid, treble level/dB
    scuffs = [(3.898, 0.053, -64, -57, -62.5), (4.006, 0.1, -65, -59, -62.5),
              (4.187, 0.08, -63, -55.5, -63), (4.337, 0.16, -66, -60, -66), (5.736, 0.18, -48, -85, -60.5),
              (5.79, 0.052, -66, -81, -56), (5.863, 0.2, -61.5, -81, -68), (6.207, 0.14, -64, -82, -63),
              (7.506, 0.56, -66, -69.5, -71.5), (7.817, 0.041, -44.5, -66, -54),
              (7.975, 0.058, -61, -68, -61), (8.001, 0.021, -52, -72, -70), (8.012, 0.055, -53, -59, -63),
              (7.824, 0.41, -60.5, -68.5, -68), (8.177, 0.14, -52, -56, -57.5)]
    levels = np.zeros((3, N))
    for s, length, *db in scuffs:
        stroke = np.sin(np.pi * np.linspace(0, 1, int(length * SR)) ** 0.72)
        for level, gain in zip(levels, amp(db)):
            add(level, s, gain * stroke)
    scratch = grains(5000, 0.95) * amp(2.3 * drift(42.0))
    edges = ((300, 1400), (1400, 4000), (4000, 13000))   # Hz
    low, mid, treble = (level * unit(band(scratch, lo, hi)) for level, (lo, hi) in zip(levels, edges))
    return low - mid + treble   # alternate signs keep neighbouring ranges from cancelling where they meet


def wind():
    """Turbulent pressure: low buffeting and rumble noise with uneven gusts, over a swaying rush of air."""
    # wind on the microphone: t/s, buffeting level/dB, rumble level/dB
    gusts = [(0.0, -16.5, -36), (0.46, -39, -33.5), (0.66, -8, -39), (0.78, -40, -41), (0.92, -21.5, -38),
             (1.84, -23.5, -45.5), (1.92, -14.5, -41), (2.06, -24, -53), (2.18, -11.5, -32),
             (2.5, -29, -39), (3.08, -24.5, -38.5), (3.44, -15.5, -35.5), (3.53, -40, -37),
             (3.67, -18, -44), (4.11, -24.5, -42.5), (4.8, -16.5, -35.5), (5.6, -33.5, -45),
             (6.1, -14.5, -36.5), (6.17, -24, -30.5), (6.75, -18.5, -31), (6.82, -24, -33),
             (7.34, -18, -32.5), (7.44, -14.5, -45), (7.55, -21.5, -28), (7.92, -24, -30.5),
             (8.24, -28.5, -69)]
    # spectral density of the buffeting: f/Hz, level/dB
    buffet_spectrum = [(2.4, -10), (4.0, 12.5), (16, 3.5), (23, -10), (30, -7), (39, -50), (66, -120)]
    # spectral density of the rush: f/Hz, level/dB
    rush_spectrum = [(41, -17), (70, -7), (125, -12.5), (275, -18), (395, -22.5), (420, -22.5),
                     (516, -24.5), (813, -32.5), (3000, -49), (3900, -74), (6600, -120)]
    buffet_db, rumble_db = in_time(gusts)
    buffet = amp(buffet_db) * coloured(rng.standard_normal(N), buffet_spectrum)
    rumble = amp(rumble_db) * unit(band(band(rng.standard_normal(N), 21.4, 41.3), 25.6, 130))
    rush_db = -45.5 - 0.82 * drift(0.095) + 1.2 * drift(7.7)   # a slow sway and a quicker one
    rush = amp(rush_db) * coloured(rng.standard_normal(N), rush_spectrum)
    return buffet + rumble + rush


def drone():
    """Harmonic tone: a fundamental and its second harmonic, wavering in pitch and level."""
    # far drone: t/s, fundamental level/dB, second harmonic level/dB, before the wavering
    harmonics = [(0, -76, -65.5), (1.5, -54.5, -63), (3, -50.5, -53), (4.5, -51.5, -57), (6, -47.5, -82),
                 (6.6, -49, -66), (8.24, -56.5, -74)]
    phase = 2 * np.pi * np.cumsum(119.4 + 2.58 * drift(3.26)) / SR   # Hz
    first, second = amp(in_time(harmonics) + 2.0 * drift(9.5))
    return first * np.sin(phase) + second * np.sin(2 * phase)


def self_noise():
    """Stationary noise: the steady shaped hiss of the microphone."""
    # spectral density of the hiss: f/Hz, level/dB
    hiss_spectrum = [(880, -8), (1500, -14), (1760, -27.5), (2110, -10.5), (4080, -8.5), (12500, -13),
                     (16400, -17)]
    return amp(-65) * coloured(rng.standard_normal(N), hiss_spectrum)


def scene():
    """Superposition: all sources add at one microphone."""
    background = wind() + drone() + self_noise()
    churning = amp(2 * drift(93.0))   # the churning surface shakes every plop and drip
    water = stream() + churning * (plops() + drips()) + glugs() + splashes() + wall()
    return (background + water + snaps() + clinks() + rustle())[None]


def record(dry):
    """Low-pass filtering: a steep Chebyshev filter holds everything above 16.7 kHz at least 70 dB down."""
    return signal.sosfilt(signal.cheby2(12, 70, 16700, fs=SR, output="sos"), dry)


dry = scene()
out = record(dry)
output_pcm(out)
```